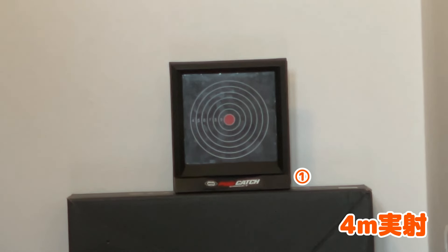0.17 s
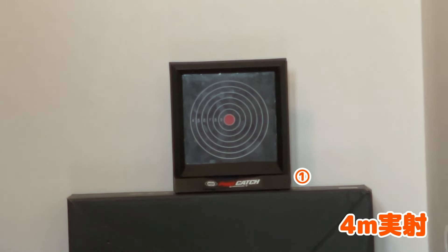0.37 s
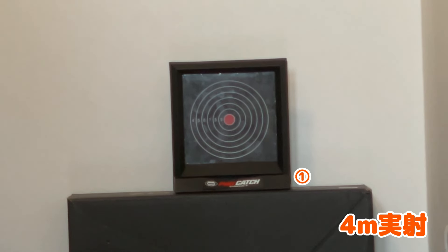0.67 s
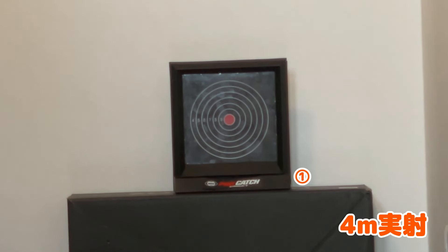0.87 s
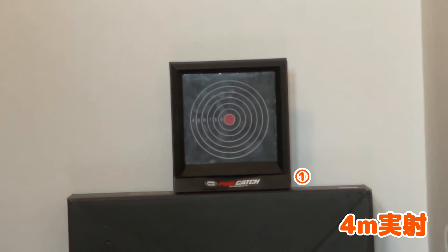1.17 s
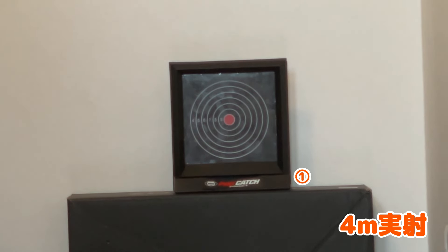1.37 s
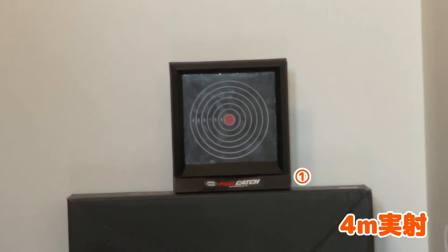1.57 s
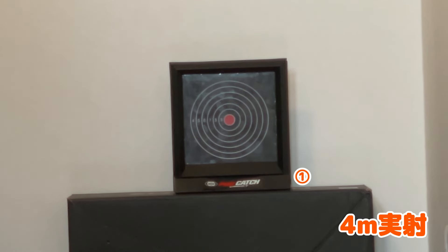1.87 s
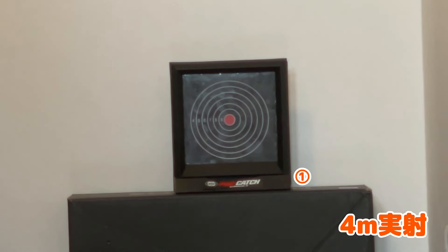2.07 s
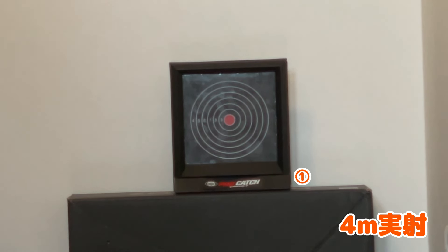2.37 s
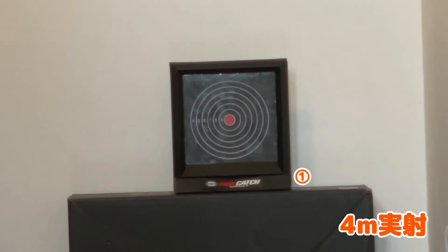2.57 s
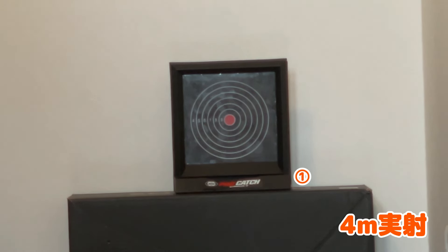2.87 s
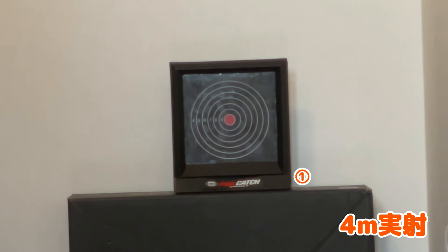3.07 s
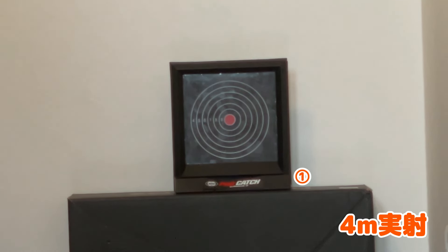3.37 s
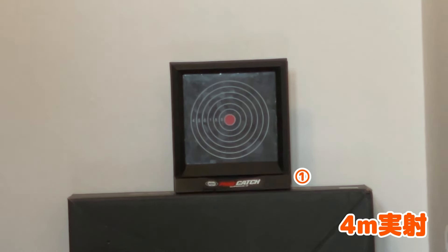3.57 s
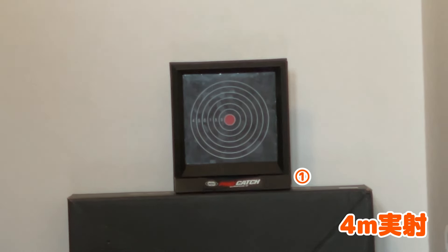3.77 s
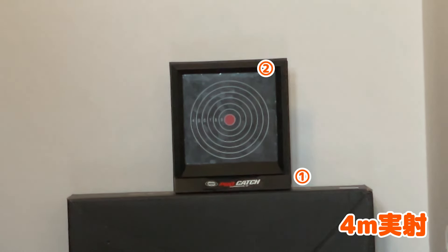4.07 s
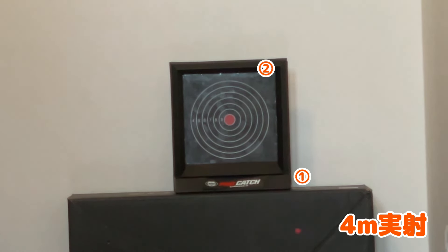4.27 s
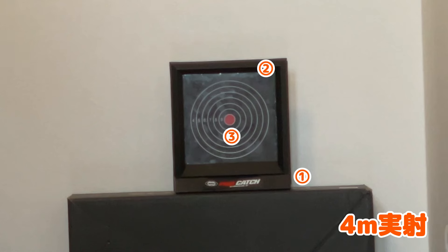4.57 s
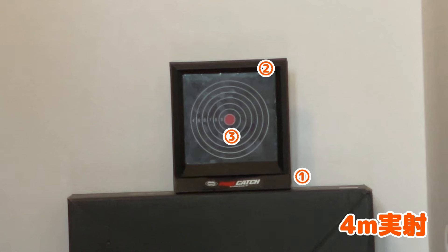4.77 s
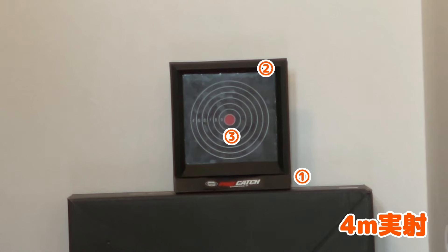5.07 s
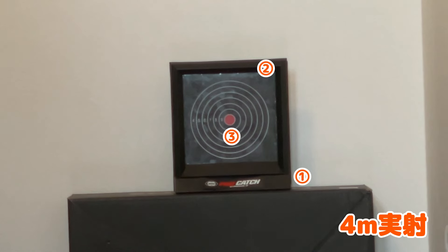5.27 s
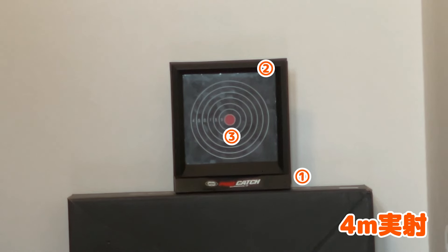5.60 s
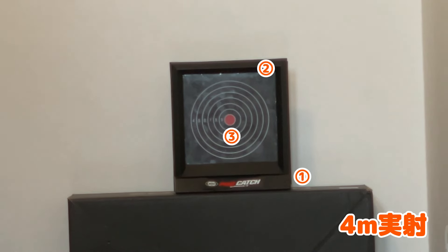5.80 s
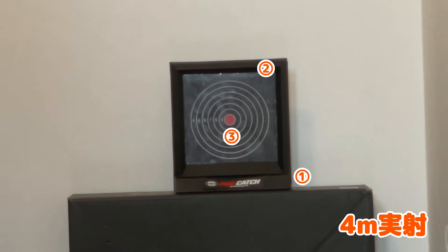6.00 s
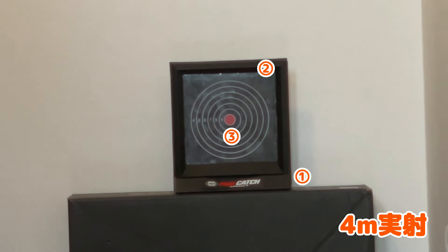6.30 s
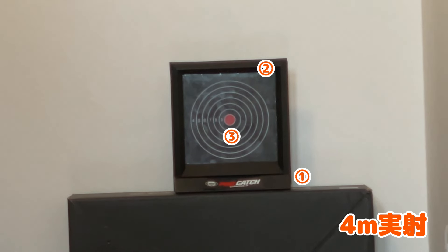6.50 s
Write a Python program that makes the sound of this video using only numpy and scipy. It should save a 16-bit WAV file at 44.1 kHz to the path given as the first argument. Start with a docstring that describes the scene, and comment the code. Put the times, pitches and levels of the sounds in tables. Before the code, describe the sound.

Light plastic bounces die away, then a harsh mechanical snap and gear rattle, two boxy slams, a bright close crack and scattered floor bounces.

```python
"""Toy pistol shot in a bare room

A toy electric pistol fires once: trigger click, piston slam, gears dragging the slide, slide closing.
What it throws out slams into a hollow box and bounces over the hard floor; an earlier shot's dies away first.
Dull knocks, small ticks and a bright snap sound close by, over rumble, hum, hiss, a far drone and a falling tone.
Each blow is a short rattling contact that rings a resonant body, and a lively room answers it.
"""
import sys
import numpy as np
from scipy import signal
from scipy.fft import rfft, irfft, next_fast_len
from scipy.io import wavfile
from scipy.ndimage import map_coordinates

SR = 44100
rng = np.random.default_rng(int(sys.argv[2]) if len(sys.argv) > 2 else 0)


def convert_level_to_amplitude(level_db):
    """Map a level in decibels to its linear amplitude factor."""
    exponent = np.asarray(level_db, float) / 20
    return 10 ** exponent


def waveform_to_disk(signal):
    """Save audio, clipped to [-1, 1], as 16-bit WAV at the path in sys.argv[1]."""
    frames = np.transpose(np.atleast_2d(signal))
    scaled = np.clip(frames, -1, 1) * 32767
    samples = np.round(scaled).astype(np.int16)
    wavfile.write(sys.argv[1], SR, samples)


N = 292824
LEAD, GRID, TAIL = SR // 10, 4096, 3 * SR // 4  # samples: early start of the track, body filter, room tail
HZ = np.fft.rfftfreq(GRID, 1 / SR)
SHOT_S = 3.6


def unit(x):
    """Scales to rms 1."""
    return x / np.sqrt(np.mean(x ** 2) + 1e-20)


def along(points, hz):
    """Reads (Hz, value) points on a log frequency axis."""
    point_hz, value = np.transpose(points)
    return np.interp(np.log(hz + 1), np.log(point_hz + 1), value)


def wobble(rate):
    """A smooth random curve with this many knots a second."""
    knots = rng.standard_normal(int(N * rate / SR) + 4)
    return map_coordinates(knots, [np.arange(N) * rate / SR])


def gate(on_s, off_s, edge_s):
    """1 between the two times, with soft edges."""
    t = np.arange(N) / SR
    return np.clip(np.minimum(t - on_s, off_s - t) / edge_s + .5, 0, 1) ** 2


def noise(gain):
    """Noise of rms 1 coloured by a gain of frequency."""
    size = next_fast_len(N)
    spectrum = rfft(rng.standard_normal(size)) * gain(np.fft.rfftfreq(size, 1 / SR))
    return unit(irfft(spectrum, size)[:N])


def resonances(modes, hz=HZ):
    """Gain of a body with (centre_hz, width_hz, level_db) resonances, their powers summed."""
    power = 0
    for centre, width, db in modes:
        damping = (hz * width) ** 2
        power = power + convert_level_to_amplitude(2 * db) * damping / ((centre * centre - hz * hz) ** 2 + damping)
    return np.sqrt(power)


def tilt(db_per_octave):
    """Gain that leans about 2 kHz."""
    return convert_level_to_amplitude(db_per_octave * np.log2((HZ + 50) / 2000))


def ringing(gain):
    """The causal, minimum-phase impulse response with this gain."""
    cepstrum = irfft(np.log(gain + 1e-6))
    # folding the cepstrum forward puts all the ringing after the blow
    cepstrum[1:GRID // 2] *= 2
    cepstrum[GRID // 2 + 1:] = 0
    return irfft(np.exp(rfft(cepstrum)))


# how long the room rings at each pitch: pitch_hz, t60_s
ROOM_DECAY = [(100, 0.37), (260, 0.51), (700, 0.53), (1840, 0.58), (4850, 0.58), (12800, 0.33)]
# first wall echoes, on average: delay_ms, level_db
WALL_ECHOES = [(16, -17), (20, -19)]
BUILD_START, BUILD_S = 0.34, 0.021  # the wash starts at this share and builds at one per BUILD_S


def room():
    """A fresh tail: clear wall echoes while the wash builds up; each frequency dies at its own speed."""
    hz, t, bins = signal.stft(rng.standard_normal(TAIL), SR, nperseg=256)
    decay = convert_level_to_amplitude(-60 * t / along(ROOM_DECAY, hz)[:, None])
    tail = signal.istft(bins * decay, SR, nperseg=256)[1][:TAIL]
    t = np.arange(TAIL) / SR
    tail = tail * np.clip(BUILD_START + t / BUILD_S, 0, 1) * (t > .002)
    tail = tail / np.linalg.norm(tail)
    ms, db = np.transpose(WALL_ECHOES)
    ms = ms + rng.normal(0, 1, len(ms))
    db = db + rng.normal(0, 2, len(db))
    tail[np.round(ms * SR / 1000).astype(int)] += convert_level_to_amplitude(db)
    return tail


def add(track, s, db, gain, contact_ms, room_db, reflection_db=-60, shade_hz=20000):
    """One blow: a rattling contact rings the body, then the room answers with the body's colour."""
    t = np.arange(GRID // 2) / SR
    # a duller reflection from a near surface arrives 1.72 ms later
    duller = ringing(gain / (1 + (HZ / 6000) ** 4))
    body = ringing(gain) + convert_level_to_amplitude(reflection_db) * np.roll(duller, round(.00172 * SR))
    force = rng.standard_normal(len(t)) * np.exp(-(t / (contact_ms / 1000)) ** 2)
    force[0] = 1.0
    # the straight path may be shaded, which dulls it
    shade = ringing(1 / (1 + (HZ / shade_hz) ** 3))
    blow = signal.fftconvolve(signal.fftconvolve(force, body), shade)[:GRID]
    blow = convert_level_to_amplitude(db) * blow / np.abs(blow).max()
    # sound sent in all directions averages out the contact's chance colour
    spread = body * np.linalg.norm(blow) / np.linalg.norm(body)
    sound = convert_level_to_amplitude(room_db) * signal.fftconvolve(spread, room())
    sound[:GRID] += blow
    start = round(s * SR) + LEAD
    track[start:start + len(sound)] += sound


# the hollow box and its side panel, before the lean of each slam: centre_hz, width_hz, level_db
BOX_MODES = [(86.1, 9, -11), (200, 27, 1), (400, 320, -11.5), (639.5, 490, 7.5), (1247, 350, 0.5),
             (2040, 1300, 4.5), (3620, 730, 4), (5327, 1800, -3.5), (13000, 5000, -48.5)]
PANEL_MODES = [(82, 13, -5), (320, 41, 1), (1103, 150, 4), (1510, 210, 2)]
# blows on the box: start_s, peak_db, contact_ms, lean_db_per_octave, panel_db
BOX_SLAMS = [(-.02, -2, 4.3, -2, 8.5), (3.949, 1.5, 6, -4, -19), (4.16, 1, 7.95, -4, -13)]


def slams(track):
    """What is thrown out slams into the hollow box, ringing the box and its side panel."""
    for s, db, contact_ms, lean, panel_db in BOX_SLAMS:
        box = resonances(BOX_MODES) + convert_level_to_amplitude(panel_db) * resonances(PANEL_MODES)
        add(track, s, db, box * tilt(lean), contact_ms, room_db=1.68)


# colour of the air rumble: pitch_hz, level_db
RUMBLE_COLOUR = [(4, -30), (9, -3), (24, 1), (38, -10), (55, -22), (70, -27), (100, -27), (150, -34),
                 (300, -120)]


def rumble():
    """Low air rumble: coloured noise with an unsteady level."""
    level_db = -40.5 + 1.5 * wobble(4.6) + 2.7 * wobble(8.8)
    return convert_level_to_amplitude(level_db) * noise(lambda hz: convert_level_to_amplitude(along(RUMBLE_COLOUR, hz)))


# colour of the hiss: pitch_hz, level_db
HISS_COLOUR = [(35, -29), (60, -5.5), (189, -16), (238, -18.5), (308, -17.5), (417, -18.5), (566, -25.5),
               (803, -30), (1380, -35), (14900, -46), (16000, -43)]


def hiss():
    """Steady hiss: coloured noise, fullest in the low range."""
    return convert_level_to_amplitude(-58) * noise(lambda hz: convert_level_to_amplitude(along(HISS_COLOUR, hz)))


# hum tones, about which pitch and level wander: pitch_hz, level_db
HUM_TONES = [(120, -75), (241, -64.5), (361, -71), (414.5, -67), (511.4, -67)]


def hum():
    """A faint hum of sine tones, each wandering in pitch and level."""
    total = np.zeros(N)
    for hz, db in HUM_TONES:
        phase = 2 * np.pi * np.cumsum(hz + 3 * wobble(12)) / SR
        total += convert_level_to_amplitude(db + 2 * wobble(8)) * np.sin(phase)
    return total


DRONE_DB, DRONE_NEAREST_S, DRONE_PASS_S = -63, 4.3, 0.56  # average level when nearest, its time, pace of passing


def drone():
    """A far drone: noise resonating near 850 Hz that swells and fades as if passing."""
    t = np.arange(N) / SR
    nearness = 1 / np.hypot(1, (t - DRONE_NEAREST_S) / DRONE_PASS_S)
    tone = noise(lambda hz: resonances([(850, 420, 0)], hz) ** 2)
    return convert_level_to_amplitude(DRONE_DB + 1.5 * wobble(5.5)) * nearness * tone


# dull knocks near the microphone: start_s, peak_db, pitch_hz, upper_mode_db
NEAR_KNOCKS = [(0.279, -33, 298, -11), (0.289, -26.5, 330, -14), (0.3188, -20.5, 400, -14),
               (0.4206, -10.5, 330, 4), (.493, -30, 530, -20), (0.529, -28.5, 330, -20),
               (0.569, -32.5, 400, -18), (0.728, -36.5, 413, -26), (.756, -38, 452, -27),
               (0.807, -38, 445, -20), (.9015, -25.5, 378, 3), (1.427, -39.5, 444, -5),
               (4.91, -33, 400, 9.5)]
KNOCK_T60_MS, UPPER_RATIO = 20.7, 1.865


def knocks(track):
    """Soft knocks close by ring two low, short modes, nearly dry."""
    width = 2200 / KNOCK_T60_MS  # Hz: the shorter the ring, the broader the mode
    for s, db, hz, upper_db in NEAR_KNOCKS:
        soft = 0
        for mode in [(hz, width, 0), (UPPER_RATIO * hz, width, upper_db)]:
            soft = soft + resonances([mode]) / (1 + (HZ / (1.56 * mode[0])) ** 4)
        add(track, s, db, soft, contact_ms=.15, room_db=-9.5)


# colour of the light plastic, before the lean of each bounce: pitch_hz, level_db
PLASTIC_COLOUR = [(300, -47), (900, -10), (1500, 0), (2400, 1.5), (4000, 0.5), (6500, -2), (9200, -6),
                  (12000, -18), (15500, -31.5)]
# floorboards, before squaring (which doubles the dB and narrows the peaks): centre_hz, width_hz, level_db
FLOOR_MODES = [(330, 184, 4), (750, 340, 3.5)]
# bounces on the floor: start_s, peak_db, lean_db_per_octave, thud_db, reflection_db
FLOOR_BOUNCES = [(0.2986, -18.5, 1.5, -2.5, -16), (0.5977, -23, 3.5, -7, -1), (0.8419, -25, 2.5, -1.5, -9),
                 (0.9759, -26.5, 1, -4.5, -11), (1.085, -27.5, -3, -16, -17),
                 (4.6009, -22, 1.5, -8.5, -10.5), (4.701, -31.5, -0.5, -15, -23),
                 (4.797, -30.5, 0.5, -13.5, -11), (4.886, -29, -2.5, 2.5, -37), (5.032, -27, 2, -4, -18),
                 (5.2192, -37, -0.5, -2, -16), (5.24, -45.5, -7.5, 3, -16.5),
                 (5.486, -51.5, -5.5, -11, -17)]
BOUNCE_ROOM_DB, FARTHER_DB = 4.5, 2.5  # the later shot's bounces lie farther off, with more room


def bounces(track):
    """Light plastic bounces, each thudding on the boards and reflected by a near surface."""
    for s, db, lean, thud_db, reflection_db in FLOOR_BOUNCES:
        plastic = convert_level_to_amplitude(along(PLASTIC_COLOUR, HZ)) * tilt(lean)
        thud = convert_level_to_amplitude(thud_db) * resonances(FLOOR_MODES) ** 2
        room_db = BOUNCE_ROOM_DB + FARTHER_DB * (s > SHOT_S)
        add(track, s, db, plastic + thud, 2.27, room_db, reflection_db, shade_hz=5860)


# small ticks, width before squaring narrows it: start_s, peak_db, pitch_hz, width_hz
SMALL_TICKS = [(0.492, -38, 5000, 6000), (1.151, -27, 2740, 3500), (1.429, -44, 2830, 3000),
               (1.457, -51, 2970, 1990), (1.57, -50.5, 3980, 5000), (2.126, -51, 1600, 500),
               (2.27, -57, 600, 100.3), (2.468, -55, 1670, 600), (2.648, -36.5, 3580, 3000),
               (2.745, -57, 6440, 596), (3.058, -59, 6500, 600), (3.122, -55, 803, 149),
               (6.128, -49, 1200, 200)]


def ticks(track):
    """Small ticks close by each ring one mode."""
    for s, db, hz, width in SMALL_TICKS:
        add(track, s, db, resonances([(hz, width, 0)]) ** 2, contact_ms=.5, room_db=-6)


WHINE_S, WHINE_LENGTH_S = 1.49, .33
WHINE_HZ, FALL_HZ_PER_S = 1390, 920  # average first pitch, and its fall
WHINE_DB, WHINE_FADE_DB_PER_S = -74, 16  # average first level, and its fade


def whine():
    """One faint falling tone, made fuzzy by fast random pitch and level."""
    t = np.arange(N) / SR
    since = np.clip(t - WHINE_S, 0, WHINE_LENGTH_S)
    fade = convert_level_to_amplitude(WHINE_DB - WHINE_FADE_DB_PER_S * since)
    swell = fade * gate(WHINE_S, WHINE_S + WHINE_LENGTH_S, .06)
    pitch = WHINE_HZ - FALL_HZ_PER_S * since + 30 * wobble(60)
    return swell * convert_level_to_amplitude(5 * wobble(30)) * np.sin(2 * np.pi * np.cumsum(pitch) / SR)


# the pistol's hollow frame and its slide, before any lean: centre_hz, width_hz, level_db
FRAME_MODES = [(500, 75, 0), (850, 180, -5), (1420, 210, -3.5), (2405, 720, -10.5), (4130, 910, -10.5),
               (7600, 670, -12), (10700, 2300, -16.5)]
SLIDE_MODES = [(1680, 110, -2.5), (3730, 310, -6), (4500, 350, -5.5)]


def pistol_body(ring_db, lean):
    """Gain of frame plus slide, too small to send out bass."""
    small = 1 / (1 + (240 / (HZ + 1)) ** 3)
    return (resonances(FRAME_MODES) + convert_level_to_amplitude(ring_db) * resonances(SLIDE_MODES)) * tilt(lean) * small


# trigger, piston letting go, two piston hits, slide opening, slide closing:
# start_s, peak_db, contact_ms, slide_ring_db, lean_db_per_octave
PISTOL_BLOWS = [(3.604, -12, 5.1, 12.5, -1.5), (3.63, -21.5, 1.2, -10, 2), (3.635, -0.5, 6.9, -1, 2.5),
                (3.6411, 5, 4.65, -9, -2.5), (3.7523, -0.5, 8, 5.5, 3), (3.850, 6, 4.3, -15, -1.5)]
BLOW_ROOM_DB, ROOM_PER_DB = -4, 0.36  # room share of a 0 dB blow, and its rise per dB


def pistol_blows(track):
    """Blows on the frame and slide; louder ones fill the room more."""
    for s, db, contact_ms, ring_db, lean in PISTOL_BLOWS:
        add(track, s, db, pistol_body(ring_db, lean), contact_ms, BLOW_ROOM_DB + ROOM_PER_DB * db)


# low thumps under the pistol's two loudest blows: start_s, peak_db
LOW_THUMPS = [(3.642, -22), (3.851, -23)]
THUMP_HZ, THUMP_WIDTH_HZ = 120, 210


def low_thumps(track):
    """A short, dry, low thump under each of the pistol's two loudest blows: one broad, damped mode."""
    thump = resonances([(THUMP_HZ, THUMP_WIDTH_HZ, 0)]) / (1 + (HZ / (2 * THUMP_HZ)) ** 4)
    for s, db in LOW_THUMPS:
        add(track, s, db, thump, contact_ms=.15, room_db=-23)


MOTOR_ON_S, HARDEST_S, STOP_S = 3.645, 3.80, 3.85  # the gears strain most as the spring is fully drawn
HARDEST_DB, STRAIN_DB_PER_S, EASE_DB_PER_S = -19, 111.5, 300  # level at the peak, rise before, fall after


def gears():
    """Gear teeth chatter unevenly through the slide and frame, louder as they strain against the spring."""
    struck = rng.random(N) < 2500 / SR  # about 2500 teeth a second
    teeth = struck * convert_level_to_amplitude(2 * rng.standard_normal(N)) * rng.standard_normal(N)
    body = ringing(resonances(SLIDE_MODES) + 0.45 * resonances(FRAME_MODES))
    chatter = unit(signal.fftconvolve(teeth, body)[:N])
    t = np.arange(N) / SR
    rise_db = STRAIN_DB_PER_S * (t - HARDEST_S)
    fall_db = EASE_DB_PER_S * (HARDEST_S - t)
    strain_db = HARDEST_DB + np.minimum(rise_db, fall_db)
    return convert_level_to_amplitude(strain_db) * gate(MOTOR_ON_S, STOP_S, .01) * chatter


# gear teeth catching the slide: start_s, peak_db, contact_ms
GEAR_CLACKS = [(3.775, -3, 3.5), (3.7807, -2, 4.1), (3.791, -5, 3), (3.7971, -1, 1.5), (3.8033, 4.5, 6),
               (3.818, 3, 5.5), (3.821, 3, 3), (3.845, -4, 1.5)]


def clacks(track):
    """Gear teeth catch the slide, which rings harder than the frame."""
    for s, db, contact_ms in GEAR_CLACKS:
        add(track, s, db, pistol_body(ring_db=7, lean=0.9), contact_ms, room_db=-8.5)


# the crack of the snap: centre_hz, width_hz, level_db
SNAP_MODES = [(2500, 3300, -6), (8000, 5000, -5.5), (12320, 2000, -2)]
SNAP_S, SNAP_KNOCK_HZ, SNAP_KNOCK_WIDTH_HZ = 4.3093, 697, 290


def snap(track):
    """One bright, dry bounce right by the microphone: its crack, and the knock of the surface it strikes."""
    add(track, SNAP_S, -5.5, resonances(SNAP_MODES), contact_ms=1.2, room_db=-8.5)
    knock = resonances([(SNAP_KNOCK_HZ, SNAP_KNOCK_WIDTH_HZ, 0)]) / (1 + (HZ / (1.6 * SNAP_KNOCK_HZ)) ** 4)
    add(track, SNAP_S, -4.5, knock, contact_ms=.15, room_db=-12.5)


def scene():
    """All blows on one track that starts a little early, over the gears and the background."""
    track = np.zeros(LEAD + N + SR)
    for source in (slams, knocks, bounces, ticks, pistol_blows, low_thumps, clacks, snap):
        source(track)
    background = rumble() + hiss() + hum() + drone() + whine()
    return (track[LEAD:LEAD + N] + gears() + background)[None]


def top_cut(x):
    """Nothing passes above the cut-off."""
    return signal.sosfilt(signal.butter(12, 16420, fs=SR, output="sos"), x)


def record(dry):
    """The loudest blows clip softly and the top treble is cut."""
    clipped = dry / (1 + np.abs(dry) ** 6) ** (1 / 6)
    treble_cut = signal.cheby2(10, 30, 16400, fs=SR, output="sos")
    dulled = signal.sosfilt(treble_cut, clipped)
    return top_cut(dulled)


dry = scene()
out = record(dry)
waveform_to_disk(out)
```